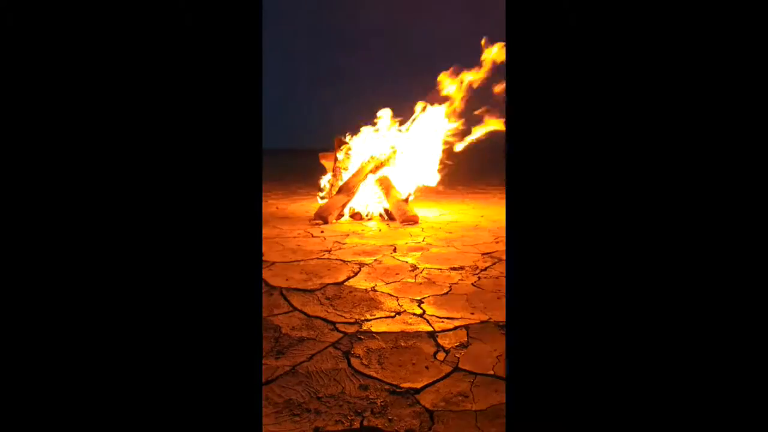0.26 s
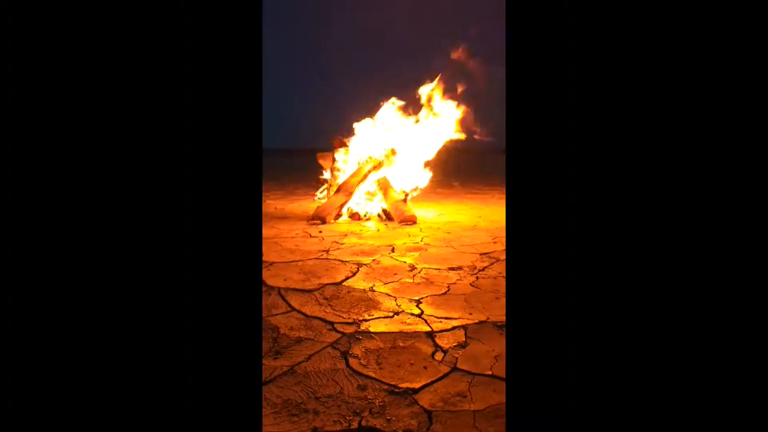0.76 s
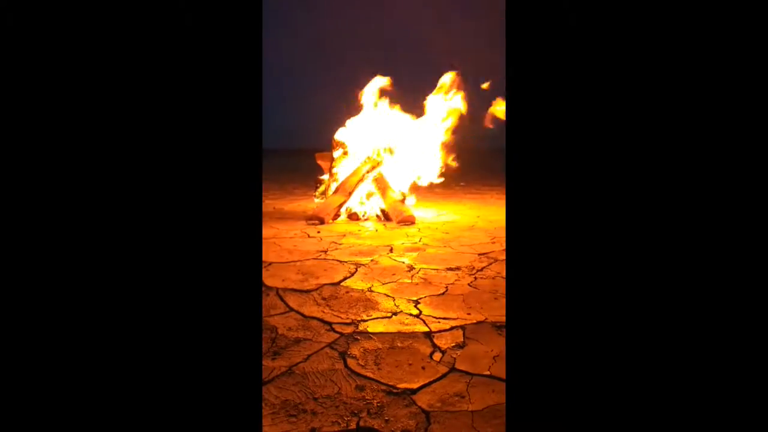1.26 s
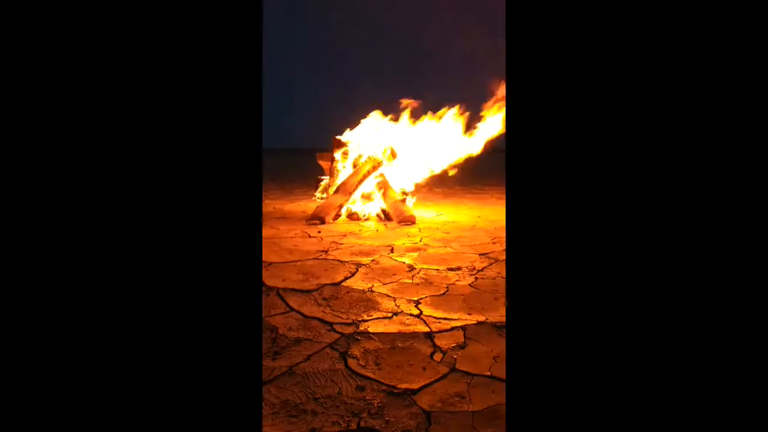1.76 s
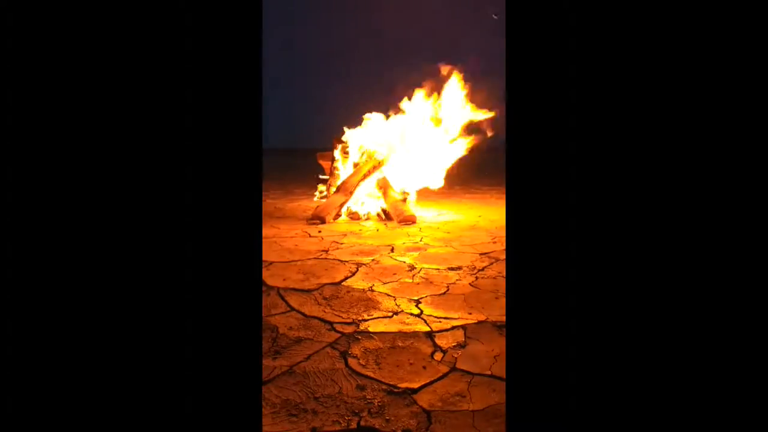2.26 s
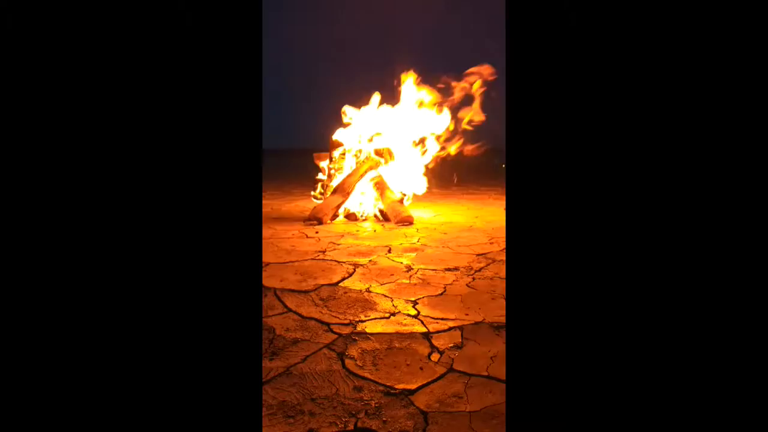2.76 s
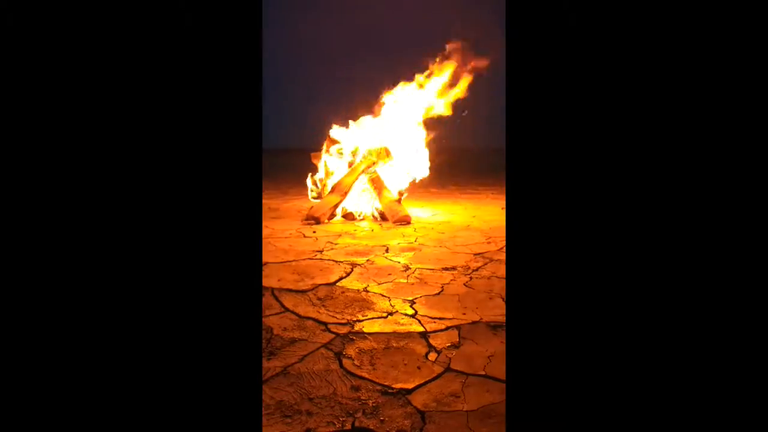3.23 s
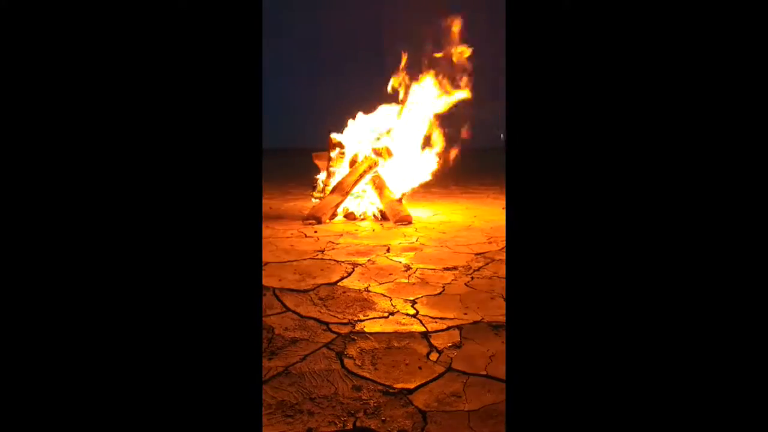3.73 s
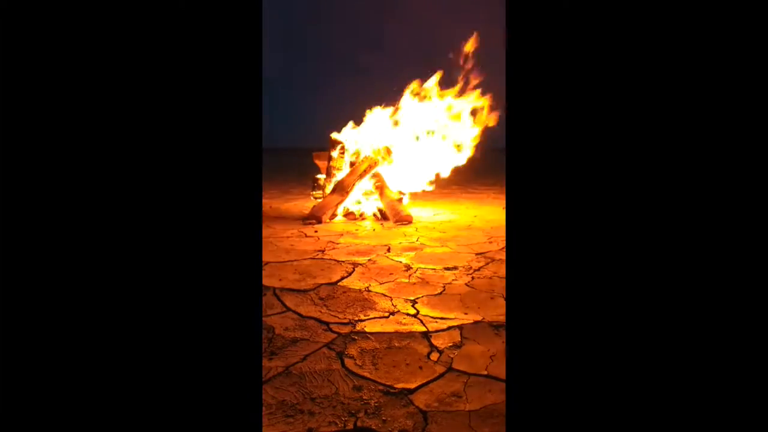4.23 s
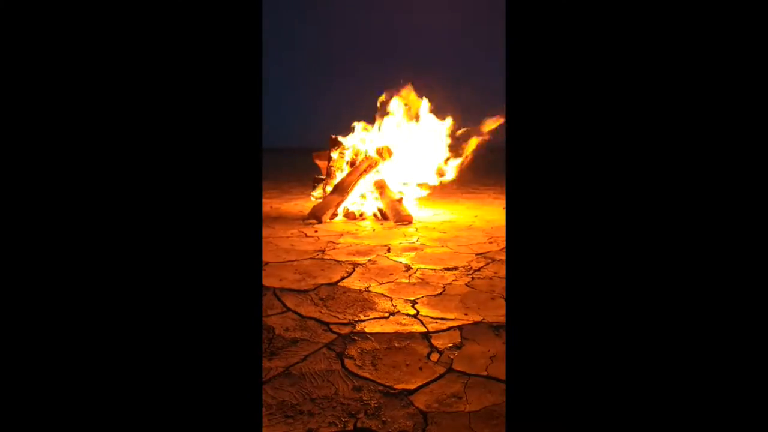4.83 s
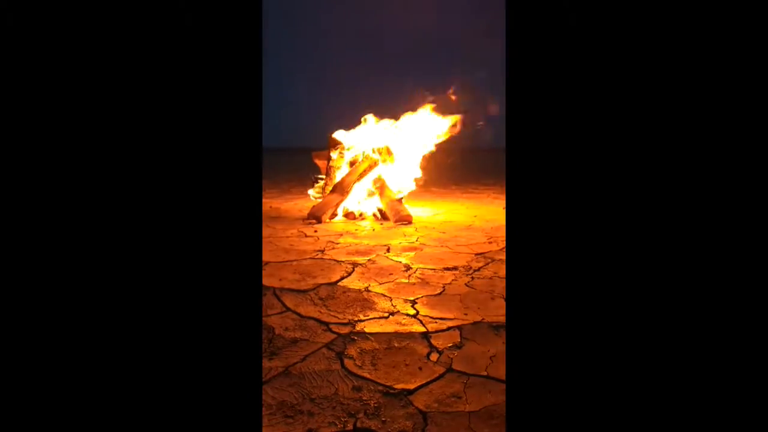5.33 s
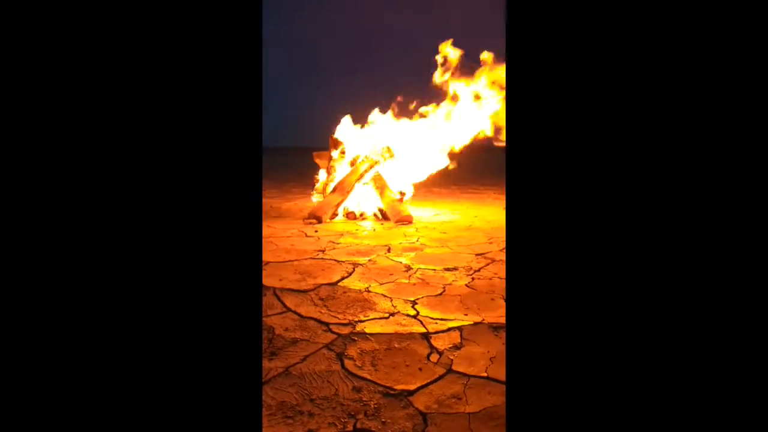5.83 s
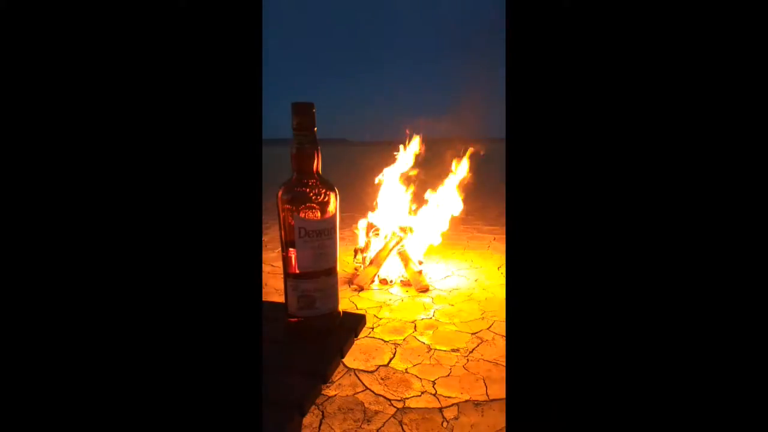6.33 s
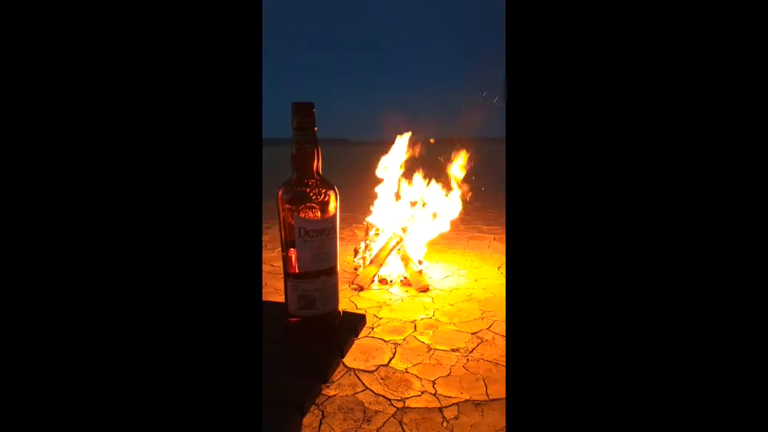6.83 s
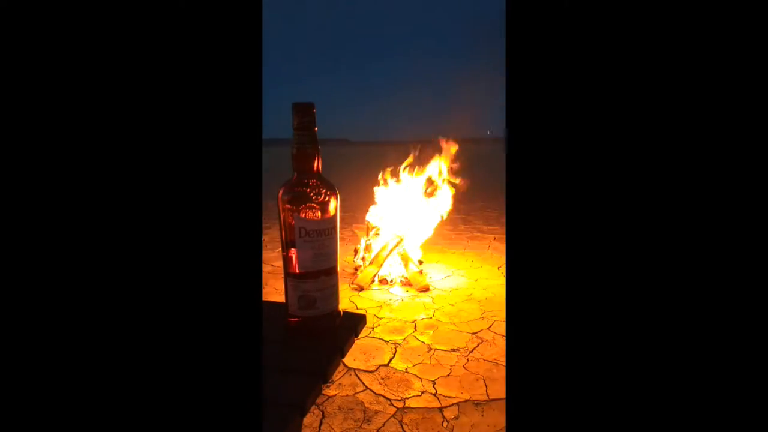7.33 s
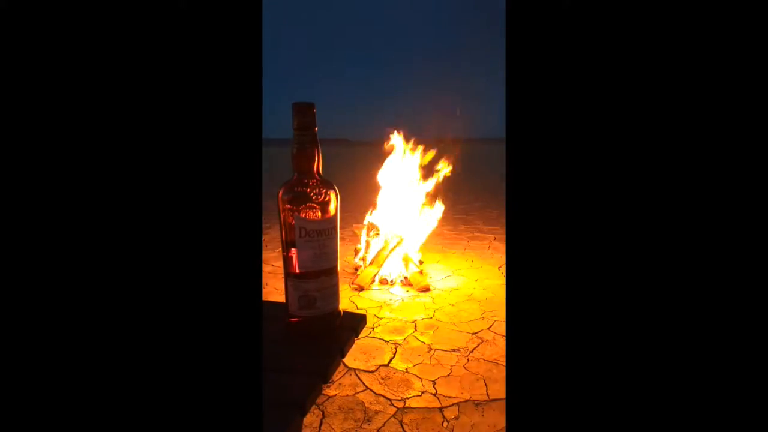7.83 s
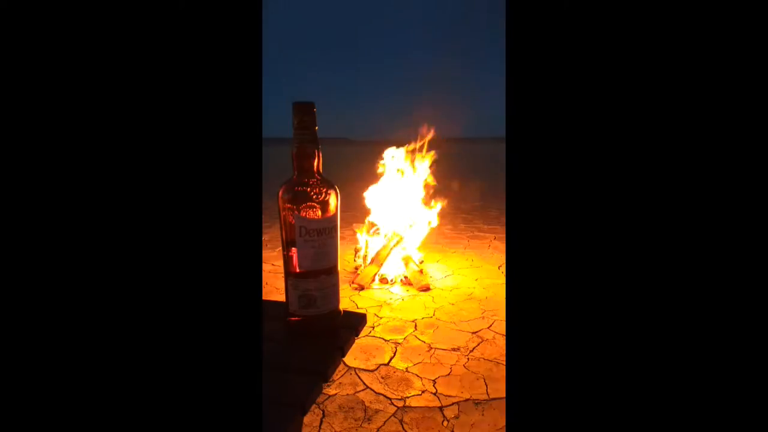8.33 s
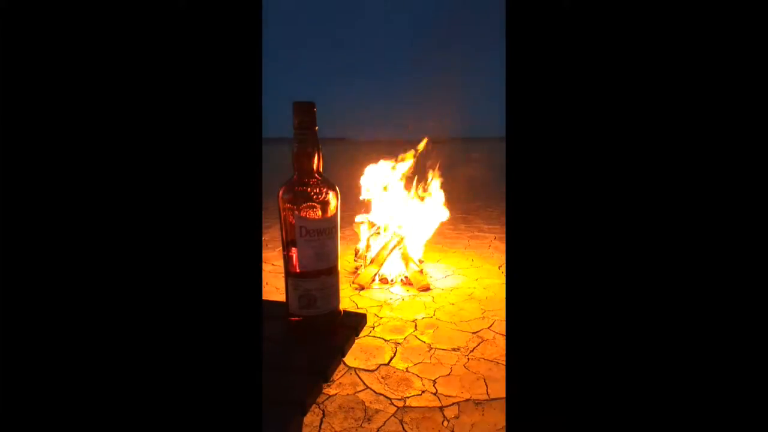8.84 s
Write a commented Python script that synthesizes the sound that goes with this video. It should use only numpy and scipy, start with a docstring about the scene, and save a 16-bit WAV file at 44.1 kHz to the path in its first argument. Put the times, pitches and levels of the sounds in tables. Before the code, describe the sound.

A wood bonfire burns on open desert ground with a steady, hollow hiss, fine ticking and a low, uneven rumble. Sharp snaps and dull pops stand out, several in the first few seconds. Wind thumps the phone microphone at the start and buffets it most just before six seconds. The sound cuts out briefly near the start and again at about six seconds, fading back in each time to more crackling.

```python
"""A dull pop and a thump of wind over the hiss of a wood bonfire on open, hard desert ground.
Gas streams from the logs, splinters snap, char ticks, sap whistles and the flames rumble in the breeze.
Gusts buffet a phone's two microphone ports, most thickly just before six seconds.
The level dips at some loud snaps and pops and creeps back; twice the sound drops out and fades in."""
import sys
import numpy as np
from scipy import signal
from scipy.fft import rfft, irfft, next_fast_len
from scipy.io import wavfile
from scipy.ndimage import uniform_filter1d

SR = 44100
rng = np.random.default_rng(int(sys.argv[2]) if len(sys.argv) > 2 else 0)


def int16_out(signal):
    """Quantize to a 16-bit WAV file."""
    q = np.round(np.clip(np.atleast_2d(signal).T, -1, 1) * 32767)
    wavfile.write(sys.argv[1], SR, q.astype(np.int16))


N = 400869
TIME = np.arange(N) / SR

# Splitting wood. Each row: start in seconds, relative level in dB, then the EQ in dB for woody body,
# knock, bright edge and top, then ring pitch in Hz, ring level in dB, tearing level in dB.
SNAPS = [(0.2468, -72, -6, -6, 6, 0, 5500, 0, 1), (0.3922, -63, -8, -8, -1, -2, 7900, 0, 0),
         (0.6461, -63, -8, -8, 2, 0, 5100, 0, -4), (1.0105, -50, -10, -8, -10, -12, 5100, -6, -0.5),
         (1.0547, -21.5, -11, -5, -11, -15.5, 2820, -3.5, -1.5),
         (1.385, -22.5, -4.5, -0.5, -8, -6, 3240, -1, -1), (1.6272, -34.5, -0.5, -3, -14, -19, 4100, 2, -3),
         (2.3345, -20.5, -1.5, 0, -12, -19, 3050, 5, -1.5), (2.9695, -55, -5, -8, -5, 3, 5500, 2, 1),
         (3.0641, -55, -10, -3, 0.5, -2, 4900, 1, -4), (5.0938, -52, 6, 2, -2, 3, 10700, -1, -4),
         (5.5048, -33, 6.5, 9.5, -9.5, -9, 2600, 3, -8), (5.8234, -41.5, -1, 8, -2.5, -6, 3350, 7.5, 3),
         (6.2844, -30, 2.5, -2.5, -10, -7, 4800, 3.5, -2.5), (6.9134, -31.5, -9, -8, -5, 3, 2230, -9, -2),
         (6.9793, -34, -2, -6, -2.5, 3, 4400, 8.5, 7)]
def snaps(gain_db=27, tear_s=0.001):
    """Splinters break off; the right port faces them, the left one hears them weaker and duller."""
    ports = np.zeros((2, N))
    shade = response([(2000, -1.5), (10000, -15)])
    for at_s, db, body_db, knock_db, edge_db, top_db, ring_hz, ring_db, tear_db in SNAPS:
        wood = response([(150, body_db - 14.5), (650, body_db), (1400, knock_db), (2050, -4),
                         (2900, -1.5), (4400, -4), (5700, -2.5), (7200, edge_db), (8900, edge_db - 3),
                         (10000, edge_db + 0.5), (15000, top_db)])
        crack = np.convolve(fracture(tear_s, tear_db), wood)
        crack = undb(db + gain_db) * ringing(crack, ring_hz, ring_db, q=6.5)
        add(ports[1], crack, at_s)
        add(ports[0], np.convolve(crack, shade), at_s)
    return ports


def fracture(tear_s, tear_db, fibre_hz=2500, echo_s=0.0026, echo_db=-13, size=2048):
    """One break: a sharp release, tearing fibres, scatter among the logs and a hollow ground echo."""
    t = np.arange(size) / SR
    push = np.zeros(size)
    push[0] = 1
    highpass = signal.butter(1, fibre_hz, "high", fs=SR)
    tear, bounce = (0, tear_db, tear_s), (echo_s, -15, 0.0028)
    scatter, tail = (0, tear_db - 17, 0.0055), (0, -23, 0.0044)
    for late_s, db, decay_s in (tear, bounce, scatter, tail):
        burst = signal.lfilter(*highpass, rng.standard_normal(size) * np.exp(-t / decay_s))
        add(push, undb(db) * burst / np.linalg.norm(burst), late_s)
    # a break excites all bands alike; the wood gives it its colour
    spectrum = rfft(push)
    even = irfft(spectrum / np.sqrt(uniform_filter1d(np.abs(spectrum) ** 2, size=41)))
    add(even, undb(echo_db) * even, echo_s)
    return even * (1 - t / t[-1])


# Dull pops. Each row: centre in seconds, peak at the port in dB, corner in Hz, roll-off in dB per octave.
POPS = [(0.0985, -24, 900, 12), (0.102, -36, 300, 16), (0.107, -33.5, 400, 10), (1.3346, -7, 1850, 19.5),
        (3.5749, -5.5, 1620, 24), (4.071, -41, 450, 12), (4.267, -32, 480, 27), (4.43, -25.5, 240, 32),
        (4.905, -27.5, 290, 22), (5.0635, -13, 1100, 22), (5.3583, -25, 453, 24), (5.534, -29.5, 450, 20),
        (5.737, -32, 348, 32), (5.81, -32, 380, 13), (6.046, -29, 400, 12), (7.588, -40, 447, 20),
        (8.723, -6, 1610, 26)]
def pops(low_hz=135, size=2048):
    """Round one-cycle puffs of pressure, a pull and then a push, land on the left port."""
    ports = np.zeros((2, N))
    hz = np.fft.rfftfreq(size, 1 / SR)
    low_cut = hz ** 2 / np.hypot(hz ** 2, low_hz ** 2)
    for at_s, db, corner_hz, slope in POPS:
        exponent = slope / (10 * np.log10(2))
        band = low_cut / np.sqrt(1 + (hz / corner_hz) ** exponent)
        puff = np.roll(irfft(-1j * band), size // 2)
        add(ports[0], undb(db) * puff / np.abs(puff).max(), at_s - size / 2 / SR)
    return ports


# Foreground crackle. Each row: start in seconds, relative level in dB, pitch in Hz.
FLAKES = [(0.795, -24, 13100), (0.9896, -20, 14700), (1.224, -39, 14000), (1.5552, -29, 14000),
          (1.788, -35, 13500), (2.1053, -39, 7000), (2.3198, -19, 12400), (2.7443, -23.5, 10900),
          (3.5366, -30, 12200), (3.8933, -30, 12000), (3.9976, -24, 12200), (4.1766, -28, 8000),
          (4.268, -34, 12000), (4.455, -39, 9000), (4.605, -25, 10000), (4.7169, -38, 14500),
          (4.8461, -29, 15200), (4.9294, -27, 14000), (5.202, -36, 10000), (5.641, -19.5, 11900),
          (5.6792, -34, 11500), (6.3472, -41, 5400), (6.46, -41, 11000), (6.5288, -36, 9000),
          (7.215, -24, 12600), (7.528, -30, 14500), (8.204, -28, 14000), (8.8525, -34, 12500),
          (8.9228, -34, 12000), (8.9717, -37, 12000)]
def flakes(gain_db=1.5):
    """The larger flakes of char burst at the right port."""
    ports = np.zeros((2, N))
    for at_s, db, hz in FLAKES:
        add(ports[1], undb(db + gain_db) * flake(hz), at_s)
    return ports


def flake(hz):
    """One flake of char bursts: a thin tick with a pitch of its own."""
    tone = response([(hz / 4, -17), (hz / 1.09, -6), (hz, 0), (hz * 2, -8)])
    tick = np.convolve(fracture(tear_s=0.001, tear_db=4), tone)
    return ringing(tick, hz, ring_db=-9, q=17)


# Wind thumps. Each row: start in seconds, relative level in dB, decay in seconds, pitch in Hz.
BUFFETS = [(0.096, -26, 0.011, 155), (1.8, -50, 0.022, 90), (4.418, -32, .014, 130),
           (5.354, -32, 0.015, 125), (5.618, -33, .024, 85), (5.67, -38, 0.045, 80),
           (5.732, -28, 0.051, 82), (5.808, -36, 0.055, 150), (5.85, -33, 0.033, 130),
           (5.885, -32, .03, 100), (5.97, -30, 0.034, 151), (8.895, -39, 0.028, 125)]
# The tone of a gust. Each row: multiple of its pitch, gain in dB.
GUST_EQ = [(.2, -34), (.55, -11), (.85, -1), (1.1, -1.5), (1.6, -8), (2.5, -20.5), (5, -30), (12, -51),
           (40, -85)]
def buffets(attack_s=0.0024):
    """Gusts hit the left port: each starts with a thump and dies away in a deep flutter."""
    ports = np.zeros((2, N))
    for at_s, db, decay_s, hz in BUFFETS:
        air = noise([(hz * multiple, gain_db) for multiple, gain_db in GUST_EQ])
        age = np.maximum(TIME - at_s, 0)
        swell = np.minimum(age / attack_s, 1) * np.exp(-np.minimum(age / decay_s, 20))
        gust = swell * air
        ports[0] += undb(db) * gust * np.linalg.norm(swell) / np.linalg.norm(gust)
    return ports


# The hollow midrange bed. Each row: frequency in Hz, gain in dB.
HISS_EQ = [(250, -41.5), (510, -18), (700, -18.5), (900, -13), (1140, -6.5), (1330, -20), (1480, -4),
           (1750, 3.5), (2000, 2), (2350, -1), (2780, -3), (3150, -10.5), (3600, -28), (7000, -43.5)]
def hiss(near_db=2, flutter_db=0.58, far_db=-18):
    """Gas streams from the logs with a fluttering hiss, mostly at the left port."""
    near = noise(HISS_EQ) * undb(near_db + flutter_db * walk(25))
    return np.array([near, undb(far_db) * noise(HISS_EQ)])


# The low end: the flames' roar and the eddies at the ports. Each row: frequency in Hz, gain in dB.
ROAR_EQ = [(20, 5), (38, -24), (60, 4.5), (90, 6.5), (150, 3.5), (220, -3.5), (340, -17.5), (520, -14.5),
           (700, -35), (1200, -26.5), (3000, -69)]
EDDY_EQ = [(20, -15.5), (40, -11), (55, 6.5), (75, 7), (110, -1.5), (160, -8.5), (230, -7), (350, -10.5),
           (700, -20.5), (3000, -59)]
def rumble(roar_db=(1.5, -0.5), eddy_db=(-9.5, -22), flutter_db=0.5):
    """Both ports hear the flames roar; each also feels eddies of its own, the left one more."""
    eddies = np.array([undb(db) * noise(EDDY_EQ) for db in eddy_db])
    roar = undb(roar_db)[:, None] * noise(ROAR_EQ)
    return undb(flutter_db * walk(30)) * (roar + eddies)


# The tone of one puff of flame. Each row: frequency in Hz, gain in dB.
FLAP_EQ = [(100, -5.5), (220, 3), (400, -7), (800, -13), (1500, -18.5), (3000, -65)]
def flaps(breeze_db, gain_db=-6, growth=3.05, per_s=260, spread_db=0.5):
    """Tongues of flame tear off in dry puffs, which grow faster with the breeze than the roar does."""
    kicks = np.zeros(N)
    when, chance, sign = rng.random((int(per_s * N / SR), 3)).T
    kick_db = -spread_db * np.log(np.maximum(chance, 0.04))
    kicks[(when * N).astype(int)] = np.sign(sign - .5) * undb(kick_db)
    puffs = signal.fftconvolve(kicks, response(FLAP_EQ, size=2048))[:N]
    return undb(gain_db + growth * breeze_db) * unit(puffs)


# The swell of the rumble. Each row: time in seconds, gain in dB.
BREEZE = [(0, -2), (0.4, -2.5), (1.1, -3), (1.8, -1.5), (2.9, -2), (3.8, -2.5), (4.9, -1.2), (5.2, -2.5),
          (6, -1), (6.4, -3), (6.9, -4), (7.2, -4), (8, -3.5), (9.09, -4.5)]
def breeze():
    """The breeze fans the flames, slowly rising and falling; in dB."""
    return np.interp(TIME, *np.transpose(BREEZE))


def ticks(per_s=45, gain_db=-9, spread_db=4.5):
    """Tiny flakes burst at random all over the fire; most are faint, three in four on the right."""
    ports = np.zeros((2, N))
    for when, chance, pitch, side in rng.random((int(per_s * N / SR), 4)):
        db = gain_db - spread_db * np.log(max(chance, 0.043))
        add(ports[int(side > .25)], undb(db) * flake(7000 * 2.1 ** pitch), when * N / SR)
    return ports


# Tiny chirps. Each row: start in seconds, pitch in Hz, peak at the port in dB, rise time in seconds.
SQUEAKS = [(3.808, 3880, -52, 0.0078), (4.431, 12400, -54, 0.003), (4.614, 3970, -55, .008),
           (5.12, 4000, -56, .008), (7.45, 4000, -54, .008), (7.85, 4020, -57, .008),
           (8.917, 3950, -55, .012), (8.953, 3920, -53, 0.0079)]
def squeaks(waver=0.0066):
    """Steam squeezes out of narrow cracks in short, unsteady whistles."""
    ports = np.zeros((2, N))
    drift = 1 + waver * walk(600)
    for at_s, hz, db, rise_s in SQUEAKS:
        swell = signal.windows.hann(int(2 * rise_s * SR))
        pitch = hz * drift[int(at_s * SR):][:len(swell)]
        add(ports[1], undb(db) * swell * np.sin(2 * np.pi * np.cumsum(pitch) / SR), at_s)
    return ports


def simmer(hz=3950, gain_db=-44.5, fitful_db=5):
    """Sap boiling in the log ends keeps up a faint, fitful whistle on the right."""
    whistle = noise([(hz * .9, -40), (hz * .98, 0), (hz * 1.04, 0), (hz * 1.1, -40)])
    return np.array([np.zeros(N), whistle * undb(gain_db + fitful_db * walk(45))])


# The thin top end. Each row: frequency in Hz, gain in dB.
HIGH_HISS_EQ = [(1000, -8.5), (4000, 13), (5500, 2.5), (7000, -1.5), (9000, -5), (12000, -1.5),
                (15500, 3.5)]
def high_hiss(port_db=(-22, -24), sputter_db=2):
    """A thin, faintly sputtering high hiss, separate at each port."""
    sputter = sputter_db * walk(150)
    return np.array([undb(db + sputter) * noise(HIGH_HISS_EQ) for db in port_db])


# Ducking of the bed at loud snaps and pops. Each row: start in seconds, depth in dB.
DIPS = [(1.056, 10), (1.386, 9), (2.336, 4), (3.577, 3), (6.914, 4.5), (8.724, 2)]
def dips(recover_db_per_s=9.5, attack_s=0.0074):
    """Gain in dB: each dip adds to what is left of the last, and the level creeps back."""
    lost_db = np.zeros(N)
    for at_s, depth_db in DIPS:
        start = int(at_s * SR)
        lost_db[start:] = np.maximum(lost_db[start] + depth_db - recover_db_per_s * TIME[:N - start], 0)
    return -uniform_filter1d(lost_db, int(attack_s * SR) + 1)


# Brief silences. Each row: start, end and fade-in time in seconds, gain the bed returns to in dB.
DROPOUTS = [(0.18, 0.212, 0.32, 0.5), (6.068, 6.115, 0.94, -1.5)]
def dropouts(depth_db=-45, edge_s=0.013):
    """Gain that briefly mutes the whole sound, with soft edges."""
    silent = sum((TIME > start) & (TIME < end) for start, end, *_ in DROPOUTS).astype(float)
    return undb(depth_db * uniform_filter1d(silent, int(edge_s * SR) + 1))


def fades(opening_db=-9, floor=0.035):
    """Gain in dB: the bed opens low; after each dropout its amplitude climbs evenly, then holds."""
    db = np.full(N, float(opening_db))
    for start_s, end_s, fade_in_s, level_db in DROPOUTS:
        share = np.clip(floor + (TIME - end_s) / fade_in_s, floor, 1)
        db = np.where(TIME > (start_s + end_s) / 2, level_db + 20 * np.log10(share), db)
    return db


def undb(db):
    """Decibels to gain."""
    return 10 ** (np.asarray(db) / 20)


def unit(x):
    """Scale to rms 1."""
    return x / np.sqrt(np.mean(x ** 2))


def add(track, sound, at_s):
    """Mix a short sound into a track."""
    start = max(int(at_s * SR), 0)
    room = track[..., start:start + sound.shape[-1]]
    room += sound[..., :room.shape[-1]]


def colour(points, size):
    """Gain at each frequency bin, from (Hz, dB) points."""
    hz, db = np.transpose(points)
    return undb(np.interp(np.log(np.fft.rfftfreq(size, 1 / SR) + 1), np.log(hz), db))


def noise(points):
    """Steady noise of a given colour, rms 1."""
    size = next_fast_len(N, real=True)
    white = rfft(rng.standard_normal(size))
    return unit(irfft(white * colour(points, size), size)[:N])


def walk(per_s):
    """Smooth random wander, rms 1."""
    hold = max(int(SR / per_s), 2)
    steps = np.repeat(rng.standard_normal(N // hold + 1), hold)[:N]
    return unit(uniform_filter1d(uniform_filter1d(steps, hold), hold))


def response(points, size=512):
    """Causal impulse response of a given colour: all its energy comes as early as it can."""
    cepstrum = irfft(np.log(colour(points, size)))
    cepstrum[1:size // 2] *= 2
    cepstrum[size // 2 + 1:] = 0
    return irfft(np.exp(rfft(cepstrum)))


def ringing(x, hz, ring_db, q):
    """Add one short resonance."""
    b, a = signal.iirpeak(min(hz, .45 * SR), q, fs=SR)
    return x + undb(ring_db) * signal.lfilter(b, a, x)


def scene(flames_db=-42, treble_db=-42, treble_follow=0.8):
    """The sound at the two ports: a bed of flames, high hiss and ticks, with the single hits on top."""
    swing_db = fades() + dips()
    breeze_db = breeze()
    flames = hiss() + simmer() + undb(breeze_db) * rumble() + flaps(breeze_db)
    flames *= undb(flames_db + swing_db)
    # the high hiss and the ticks rise and fall less than the flames
    treble = undb(treble_db + treble_follow * swing_db) * (high_hiss() + ticks())
    return flames + treble + snaps() + flakes() + pops() + buffets() + squeaks()


# The bleed between the ports, and the left channel's tone. Each row: frequency in Hz, gain in dB.
CROSSFEED_EQ = [(70, -2.5), (280, -3.5), (2000, -3.5), (7000, -5), (15000, -6)]
LEFT_EQ = [(60, 1.9), (200, -1), (3000, -0.76), (6000, 0.5), (8500, -0.5), (12000, -5)]
def record(dry, lag_samples=20, top_hz=15950):
    """The phone widens the image and the top is cut; two cuts briefly silence the sound."""
    size = next_fast_len(N + SR // 10, real=True)
    ports = rfft(dry, size)
    # a late copy of each port is subtracted from the other
    late = np.exp(-2j * np.pi * np.fft.rfftfreq(size) * lag_samples)
    wide = ports - colour(CROSSFEED_EQ, size) * late * ports[::-1]
    wide[0] *= colour(LEFT_EQ, size)
    sound = irfft(wide, size)[:, :N] * dropouts()
    return signal.sosfilt(signal.ellip(10, .2, 70, top_hz, fs=SR, output="sos"), sound)


dry = scene()
out = record(dry)
int16_out(out)
```